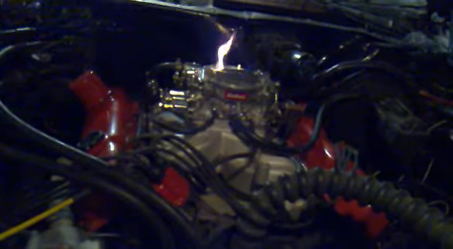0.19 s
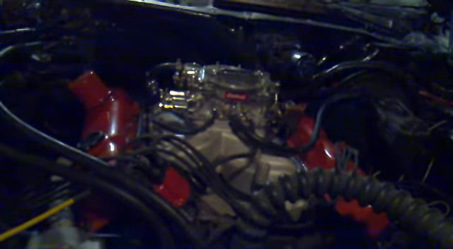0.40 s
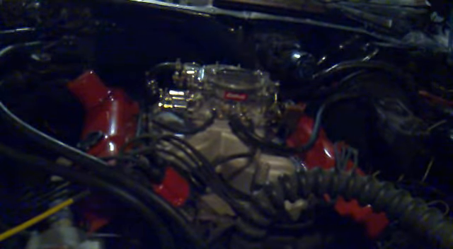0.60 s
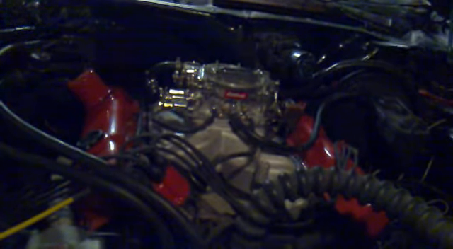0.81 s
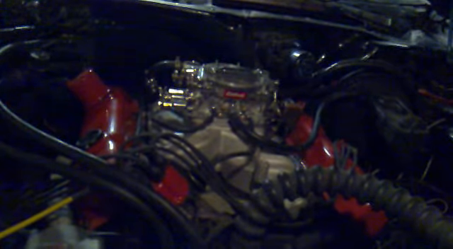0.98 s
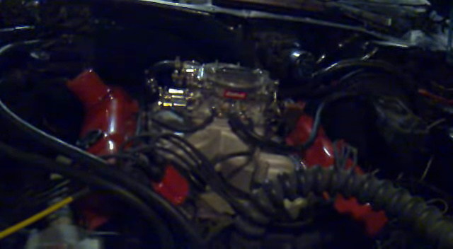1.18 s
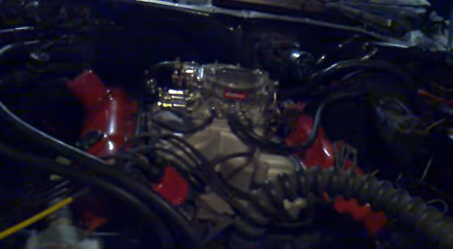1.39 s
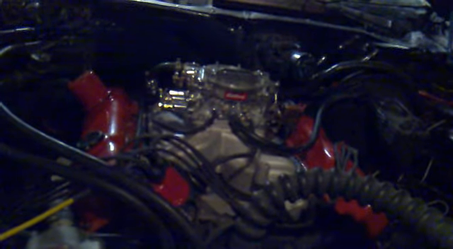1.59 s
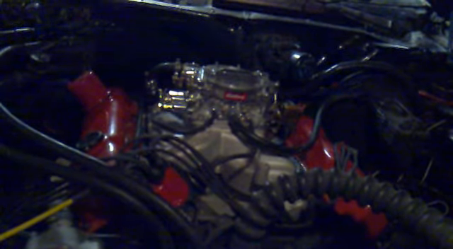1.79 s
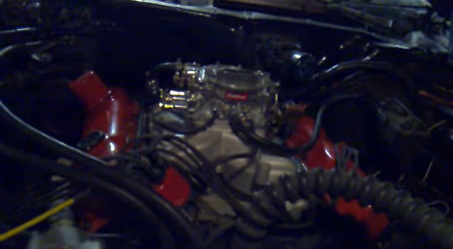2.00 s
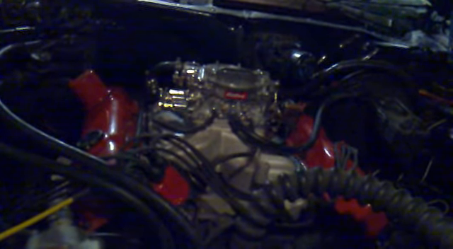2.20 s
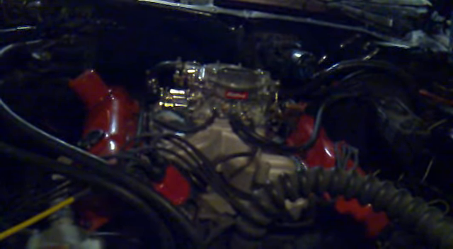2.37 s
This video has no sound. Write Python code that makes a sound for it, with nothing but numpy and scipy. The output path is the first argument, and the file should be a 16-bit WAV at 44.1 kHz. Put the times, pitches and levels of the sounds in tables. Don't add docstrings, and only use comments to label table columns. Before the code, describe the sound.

A big engine backfires through its carburetor with a booming whoosh, then the starter gear rasps briefly.

```python
import sys
import numpy as np
from scipy import signal
from scipy.fft import rfft, irfft
from scipy.io import wavfile

SR = 44100
rng = np.random.default_rng(int(sys.argv[2]) if len(sys.argv) > 2 else 0)


def put_to_file(sound):
    columns = np.atleast_2d(sound).T
    safe = np.clip(columns, -1, 1)
    whole_steps = np.round(safe * 32767)
    wavfile.write(sys.argv[1], SR, whole_steps.astype(np.int16))


def voltage_ratio(level):
    return 10 ** (np.asarray(level, float) / 20)


N = 105840


def rms_one(x):
    return x / np.sqrt(np.mean(x ** 2) + 1e-20)


def at_hz(points, hz):
    table_hz, values = np.transpose(points)
    return np.interp(np.log(hz), np.log(table_hz), values)


def coloured(x, spectrum):
    hz = np.maximum(np.arange(N // 2 + 1) * SR / N, 10)
    return rms_one(irfft(rfft(x) * voltage_ratio(at_hz(spectrum, hz)), N))


def filtered(x, order, hz, kind="low"):
    return signal.sosfilt(signal.butter(order, hz, kind, fs=SR, output="sos"), x)


def drift(rate_hz):
    r = np.exp(-2 * np.pi * rate_hz / SR)
    wander = signal.lfilter([1], [1, -2 * r, r * r], rng.standard_normal(2 * N))
    return rms_one(wander[N:])


def shape(start, rise, hold, fall):
    t = np.arange(N) / SR - start
    swell = np.clip(t / rise, 0, 1) ** 2
    return swell * voltage_ratio(-60 * np.clip(t - rise - hold, 0, 4) / fall)


def ring(x, hz, t60):
    r = voltage_ratio(-60 / (t60 * SR))
    w = 2 * np.pi * hz / SR
    return signal.lfilter([0, np.sin(w)], [1, -2 * r * np.cos(w), r * r], x + 1e-18)


def sing(x, peaks):
    out = 0
    for hz, width, db in peaks:
        t60 = np.log(1000) / np.pi / width
        out = out + voltage_ratio(db) * rms_one(ring(x, hz, t60))
    return out


def clicks(times, levels_db):
    out = np.zeros(N)
    out[(np.array(times) * SR).astype(int)] = voltage_ratio(np.array(levels_db))
    return out


def howls(swells, fall):
    t = np.arange(N) / SR
    out = np.zeros(N)
    for s, rise, hold, db, hz in swells:
        out += voltage_ratio(db) * shape(s, rise, hold, fall) * np.sin(2 * np.pi * hz * t)
    return out


# f/Hz, level per Hz/dB
FLOOR_COLOUR = [(15, -18), (40, -20), (120, -19.5), (300, -13.5), (600, -18), (1000, -21.5), (4000, -25.5),
                (15500, -28.5)]


def background():
    return voltage_ratio(-68) * coloured(rng.standard_normal(N), FLOOR_COLOUR)


# f/Hz, t60/s
GARAGE_T60 = [(60, 0.99), (150, .38), (300, 0.33), (550, .3), (2000, .29), (6000, 0.2), (9000, 0.17),
              (16000, 0.14)]


def garage(x):
    first_echo_s, late_low_hz, late_t60_s = 0.01, 250, 0.74
    t = np.arange(SR) / SR
    edges = 40 * 2 ** np.arange(0, 9.1, .25)
    tail = 0
    for low, high in zip(edges, edges[1:]):
        band = filtered(rng.standard_normal(SR), 2, [low, high], "band")
        t60 = at_hz(GARAGE_T60, np.sqrt(low * high))
        late_db = -33 + 1.5 * np.log2(low / 1000)
        late = (low > late_low_hz) * voltage_ratio(late_db - 60 * t / late_t60_s)
        tail = tail + band * (voltage_ratio(-60 * t / t60) + late) / np.sqrt(t60)
    tail = tail * np.clip(t / first_echo_s - 1, 0, 1)
    return signal.fftconvolve(x, tail / np.sqrt(np.sum(tail ** 2)))[:N]


# t/s, level/dB
HAND_BUMPS = [(.03, -54), (1.1, -51), (1.15, -48.5), (1.209, -48), (1.27, -50), (1.33, -49), (1.43, -53),
              (1.5, -58), (1.58, -59), (1.621, -63), (1.95, -58), (2.249, -62), (2.32, -50)]


def hand_on_microphone():
    rumble = voltage_ratio(-70.5) * rms_one(ring(drift(30), hz=14, t60=.15))
    s, db = np.transpose(HAND_BUMPS)
    pushes = clicks(s, db) * rng.choice([-1, 1], N)
    bump_hz = 23.74
    thuds = ring(ring(pushes, bump_hz, t60=0.073), 1.1 * bump_hz, t60=0.047)
    return rumble + 0.012 * thuds


def squeak():
    start_s, start_hz, slide_hz_per_s, width_hz = 1.41, 2750, 3800, 200
    t = np.arange(N) / SR - start_s
    turn = 2 * np.pi * (start_hz * t + slide_hz_per_s * t ** 2 / 2)
    band = drift(width_hz) * np.sin(turn) + drift(width_hz) * np.cos(turn)
    return voltage_ratio(-63) * shape(start_s, rise=0.029, hold=.085, fall=0.065) * band


# t/s, rise/s, hold/s, level/dB, dulled above f/Hz
SCUFFS = [(-.012, 0.037, .03, -52.5, 4400), (0.094, 0.0071, .04, -58, 5360),
          (0.145, 0.023, 0.0065, -47, 1500), (0.441, .03, .08, -62, 13900),
          (0.547, 0.027, 0.068, -61, 5026), (0.648, .015, 0.05, -56.5, 6170),
          (0.706, .005, .012, -55.5, 11000), (0.727, 0.011, .03, -57, 5500),
          (0.781, 0.0045, 0.015, -59.5, 8000), (0.807, 0.0066, .035, -61.5, 3006),
          (1.124, 0.043, 0.036, -54.5, 8010), (1.167, 0.0061, .01, -56.5, 6000),
          (1.197, 0.015, 0.074, -51.5, 6030), (1.245, 0.043, 0.043, -49, 12900),
          (1.338, 0.013, 0.027, -54, 8020), (1.408, 0.0097, 0.0616, -58, 10100),
          (1.471, 0.0191, 0.026, -56.5, 9040), (1.52, 0.017, .028, -60.5, 2980),
          (1.672, 0.025, 0.042, -72, 1200), (1.831, 0.052, 0.034, -61, 4003),
          (1.911, 0.028, 0.056, -60.5, 4985), (2.024, 0.032, 0.072, -62.5, 6000),
          (2.319, .02, .03, -61.5, 14030), (2.358, 0.012, .05, -56.5, 4000)]
# f/Hz, level per Hz/dB
SCUFF_COLOUR = [(150, -11.5), (400, -0.5), (800, -3), (1200, -3.5), (2300, -5), (5400, -7), (15500, -12.5)]
# f/Hz, width/Hz, level/dB
SCUFF_BODY = [(290, 23, -16.5)]
# t/s, f/Hz, level/dB, t60/s
KNOCKS = [(.025, 2850, -54, 0.0092), (0.027, 290, -64, 0.088), (.108, 2300, -65, 0.011),
          (.484, 9200, -51, .003), (.655, 477, -59, .04), (.659, 673, -62, 0.03), (.716, 860, -57.5, 0.049),
          (.745, 393, -63, 0.066), (0.779, 1250, -55, 0.021), (.781, 8000, -57, .005),
          (.785, 4180, -58, 0.014), (1.152, 950, -56, 0.019), (1.179, 2220, -57, .025),
          (1.18, 1735, -52.5, 0.027), (1.18, 1140, -46.5, .021), (1.215, 273, -51, 0.033),
          (1.265, 800, -54, .02), (1.287, 1680, -53.5, 0.034), (1.302, 650, -48.5, 0.036),
          (1.308, 1000, -48, 0.017), (1.331, 905, -52, 0.028), (1.41, 315, -51, 0.027),
          (1.436, 213, -56, 0.053), (1.5, 1300, -63, .025), (1.503, 1990, -61, 0.022)]


def scuffs():
    rubbing, weight = np.zeros(N), np.zeros(N)
    body = sing(rng.standard_normal(N), SCUFF_BODY)
    for s, rise, hold, db, dull_hz in SCUFFS:
        swell = voltage_ratio(db) * shape(s, rise, hold, fall=0.28)
        grain = coloured(rng.standard_normal(N), SCUFF_COLOUR)
        rubbing += swell * (filtered(grain, 2, dull_hz) + body)
        weight += swell
    rubbing *= voltage_ratio(1.1 * drift(37))

    knocks = np.zeros(N)
    for s, hz, db, t60 in KNOCKS:
        rub = 0.0653 * shape(s, 0.0026, 0.0093, 0.072) * rng.standard_normal((3, N))
        for part, ratio in zip(rub, [1 / 1.2, 1, 1.2]):
            knocks += voltage_ratio(db) * ring(part, hz * ratio, t60)

    thud = voltage_ratio(-21) * weight * sing(rng.standard_normal(N), [(96.4, 60, 0)])
    return thud + filtered(rubbing + knocks, 2, 219.3, "high")


# t/s, level/dB
RASP_FORCE = [
    (2.118, -52.5),
    (2.14, -29.5),
    (2.179, -22.5),
    (2.215, -24.5),
    (2.256, -29.5),
    (2.298, -39.5),
    (2.351, -54.5),
    (2.39, -71.5),
]
# f/Hz, level per Hz/dB
RASP_COLOUR = [(90, -59), (150, -20), (530, -12.5), (1220, -7), (2200, -7.5), (3500, -8), (8330, -16),
               (15500, -32.5)]
# f/Hz, width/Hz, level/dB
GEAR_MODES = [(1210, 160, -19), (1500, 63, -15.5), (2080, 31, -15), (3300, 67, -12.5), (3610, 34, -15.5)]
# t/s, f/Hz, level/dB, t60/s
PINGS = [(2.132, 298, -38.5, 0.064), (2.139, 3130, -32, 0.056), (2.165, 2080, -24, 0.044),
         (2.175, 1550, -33.5, .03), (2.178, 3300, -24.5, .07), (2.198, 1500, -28, 0.027),
         (2.21, 1770, -30, 0.053), (2.228, 1263, -29, 0.14), (2.3, 1053, -41.5, 0.088)]
# t/s, rise/s, hold/s, level/dB, f/Hz
WHISTLES = [
    (2.205, .006, 0.0095, -24.5, 3275),
    (2.222, .01, 0.018, -33.5, 3275),
    (2.255, .008, 0.0059, -37, 3300),
]


def starter():
    s, db = np.transpose(RASP_FORCE)
    force = voltage_ratio(np.interp(np.arange(N) / SR, s, db, left=-120, right=-120))

    teeth_per_s, spread_db = 3700, 1.5
    sizes = voltage_ratio(spread_db * np.minimum(rng.exponential(1, N), 4)) * rng.choice([-1, 1], N)
    strikes = rms_one(sizes * (rng.random(N) < teeth_per_s / SR))
    teeth = strikes + 1.7 * rng.standard_normal(N)
    bare = coloured(teeth, RASP_COLOUR) * voltage_ratio(1.5 * drift(43))
    modes = sing(np.roll(teeth, SR), GEAR_MODES)

    pings = sum(ring(clicks([s], [db]), hz, t60) for s, hz, db, t60 in PINGS)
    pings = filtered(pings, 2, 220, "high")
    return pings + howls(WHISTLES, fall=0.046) + voltage_ratio(-4) * force * (bare + modes)


# t/s, pipe level/dB, boom level/dB
POPS = [(0.185, -44, -44), (.193, -39, -36.5), (.205, -37, -30), (.224, -19.5, -24.5), (0.25, -32, -25.5),
        (0.2744, -12, -10.5), (0.295, -12.5, -18.5), (0.3, -16.5, -9.5), (.309, -12.5, -15),
        (0.3194, -13, -24), (0.339, -27, -16), (.347, -42, -16), (0.378, -20, -48), (0.411, -32.5, -23)]
# f/Hz, level/dB, t60/s
PIPE_MODES = [(323, 4.5, .045), (417, 0, 0.032), (212, -12.5, 0.075)]
# f/Hz, level/dB, t60/s
BOOM_MODES = [(25, -15, 0.54), (39.7, -11.5, 0.3), (76.44, -10.5, .72), (84.2, -8.5, 0.42),
              (97, -5.5, 0.07), (113, -8.5, 0.2), (143.9, -17, 0.6), (174, -20.5, 0.51), (277, -15.5, 0.31),
              (29.93, -21.5, 0.65), (71, -23, .9)]
# t/s, rise/s, hold/s, level/dB, f/Hz
HOWLS = [
    (.195, 0.01, 0.048, -28.5, 150),
    (.278, 0.015, 0.0053, -6.5, 338),
    (.212, 0.009, .012, -19, 300),
    (.312, .006, 0.0091, -12, 430),
    (.302, 0.0061, 0.0042, -12, 230),
    (.266, 0.006, .005, -14.5, 450),
    (.335, 0.0052, 0.0082, -21.5, 520),
]


def pops():
    s, pipe_db, boom_db = np.transpose(POPS)
    pipe = sum(voltage_ratio(db) * ring(clicks(s, pipe_db), hz, t60) for hz, db, t60 in PIPE_MODES)
    boom = sum(voltage_ratio(db) * ring(clicks(s, boom_db), hz, t60) for hz, db, t60 in BOOM_MODES)
    flutter_in = np.clip(10 * (np.arange(N) / SR - .4), 0, 1)
    flutter_db = 2.5 * drift(14) * flutter_in
    return filtered(pipe, 2, 905) + howls(HOWLS, fall=.03), boom * voltage_ratio(flutter_db)


# t/s, rise/s, hold/s, level/dB, extra hiss level/dB
BLASTS = [
    (0.177, 0.017, 0.014, -24, -44.5),
    (0.203, 0.02, 0.0052, -18.5, -44.5),
    (0.251, .007, .022, -15, -28),
]
# f/Hz, level per Hz/dB
JET_COLOUR = [(70, -29), (120, -17), (300, -14), (600, -4), (1020, -12.5), (3050, -15.5), (6500, -19),
              (15500, -44)]
# f/Hz, width/Hz, level/dB
BODY_RINGS = [(1383, 140, -9.5), (1730, 240, -16), (3150, 270, -13.5)]
# f/Hz, width/Hz, level/dB
THROAT_MODES = [(314.7, 89, -4.5), (341.4, 110, -9.5), (410, 110, -12.5), (585.7, 71, -15), (185.4, 64, -6)]


def backfire():
    gas, bright = np.zeros(N), np.zeros(N)
    for s, rise, hold, gas_db, hiss_db in BLASTS:
        burst = shape(s, rise, hold, fall=0.14)
        gas += voltage_ratio(gas_db) * burst
        bright += voltage_ratio(hiss_db) * burst
    white = rng.standard_normal((4, N))
    jet = coloured(white[0], JET_COLOUR) + sing(white[1], BODY_RINGS)
    jet = jet * voltage_ratio(1.2 * drift(150))
    hiss = filtered(white[3], 2, [7636, 15000], "band")
    throat_lag_s = 0.023
    throat = np.roll(gas, int(throat_lag_s * SR)) * sing(white[2], THROAT_MODES)
    return gas * jet + bright * hiss + voltage_ratio(-5.5) * throat


def scene():
    quiet = background() + hand_on_microphone() + squeak() + scuffs()
    gear = starter()
    pipe, boom = pops()
    gas = backfire()
    room = voltage_ratio(-4.5) * garage(gas + voltage_ratio(-8.5) * pipe + voltage_ratio(-10.5) * gear)
    return (quiet + gear + pipe + boom + gas + room)[None]


def low_pass(x):
    return signal.sosfilt(signal.butter(12, 15710, fs=SR, output="sos"), x)


def record(dry):
    x = filtered(dry, 1, 16, "high")
    clip_top = .72
    mix = x / (1 + np.abs(x / clip_top) ** 8) ** (1 / 8)
    return low_pass(mix)


dry = scene()
out = record(dry)
put_to_file(out)
```